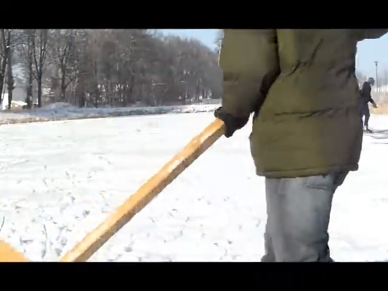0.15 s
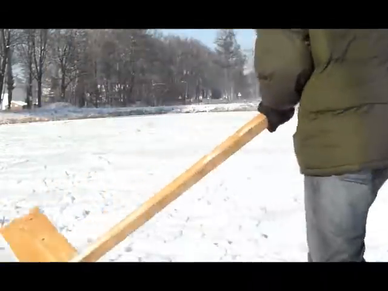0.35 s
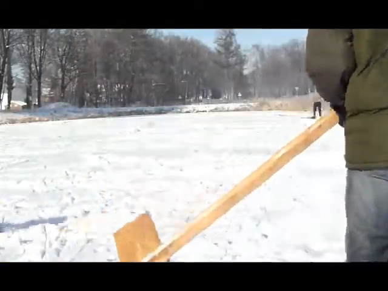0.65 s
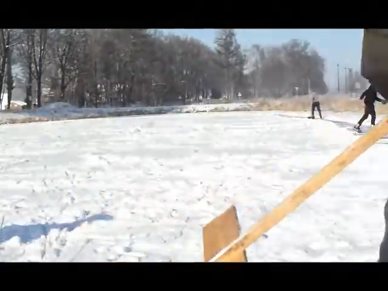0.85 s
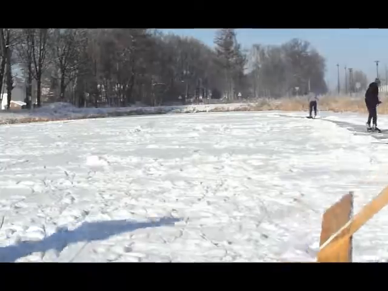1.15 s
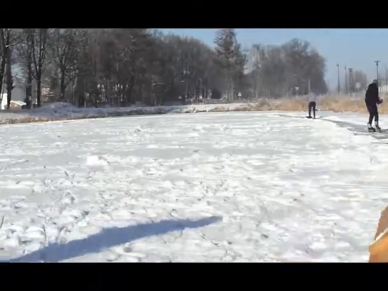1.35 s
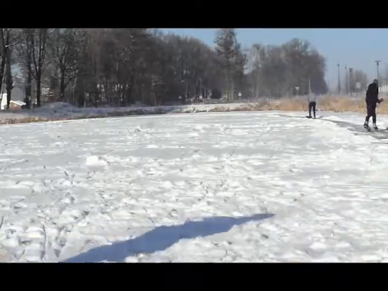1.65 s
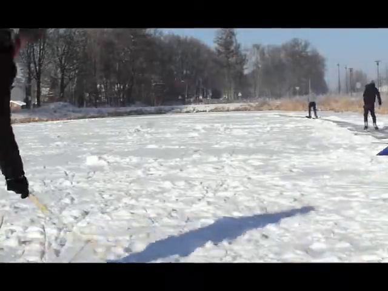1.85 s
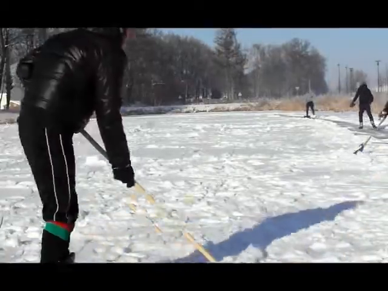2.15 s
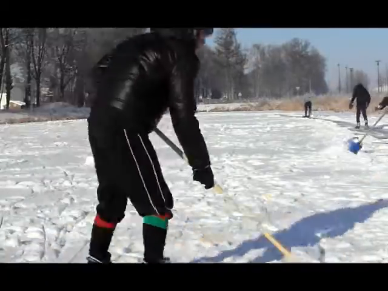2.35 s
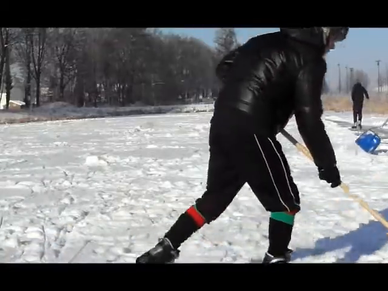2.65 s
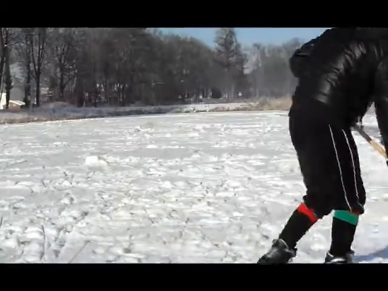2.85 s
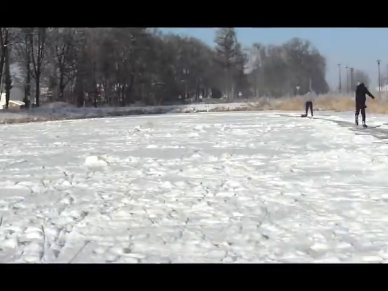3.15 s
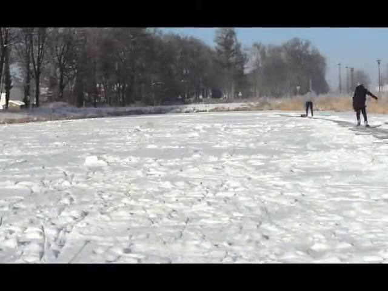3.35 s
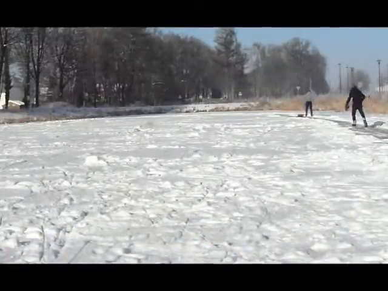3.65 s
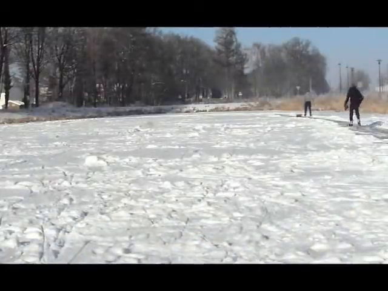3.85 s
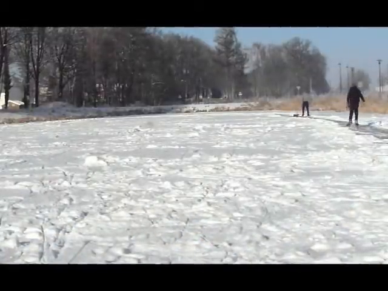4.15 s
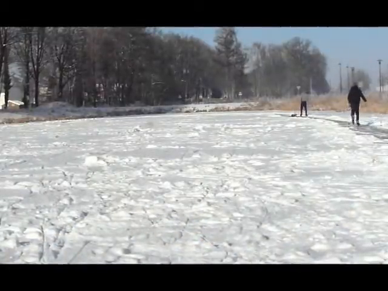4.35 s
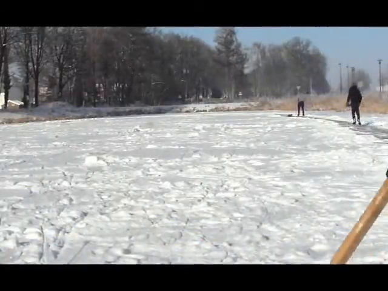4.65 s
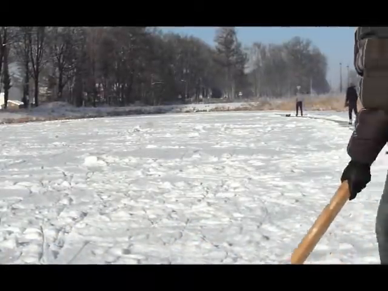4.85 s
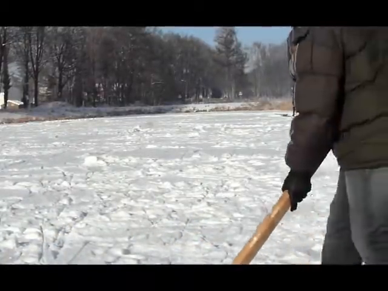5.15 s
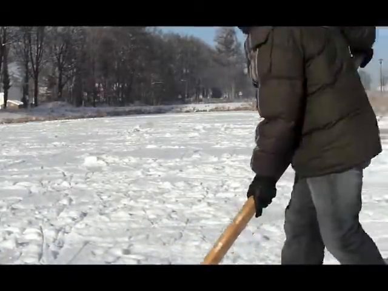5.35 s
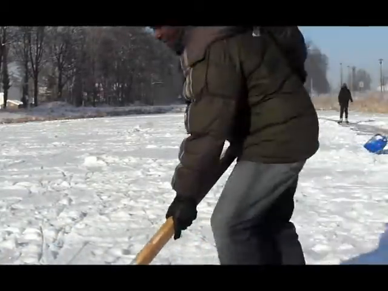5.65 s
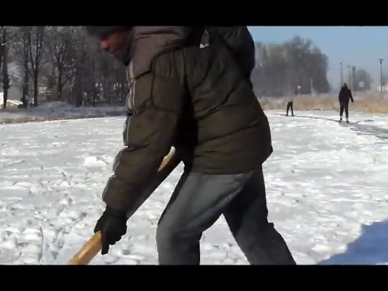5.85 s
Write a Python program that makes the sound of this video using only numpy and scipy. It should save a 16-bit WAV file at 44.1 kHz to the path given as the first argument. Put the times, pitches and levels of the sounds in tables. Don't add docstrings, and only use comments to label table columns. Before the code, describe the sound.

Near silence with faint air, then two wooden knocks as a broad shovel hits frozen ground, the second loudest. Continuous hoarse scraping over crusty snow follows, hollow and woody, shifting into a crunchier, hissier pass by another shovel. It dies away to muffled far-off scrapes and a few clicks. Low wind flutters irregularly on an outdoor handheld microphone, mostly on the right, with no echo.

```python
import sys
import numpy as np
from scipy import signal
from scipy.fft import rfft, irfft, next_fast_len
from scipy.io import wavfile
from scipy.ndimage import uniform_filter1d, map_coordinates

SR = 44100
rng = np.random.default_rng(int(sys.argv[2]) if len(sys.argv) > 2 else 0)


def dump(signal):
    limited = np.clip(np.atleast_2d(signal).T, -1, 1)
    pcm = np.round(limited * 32767).astype(np.int16)
    wavfile.write(sys.argv[1], SR, pcm)


def voltage_ratio(decibels):
    exponent = np.asarray(decibels, float) / 20
    return 10 ** exponent


N = 264687

# start [s], hold [s], level [dB], sharpness [dB].
DROPS = [
    (0.552, 0.027, -21, 8.5),
    (0.577, 0.03, -22, -2),
    (0.612, 0.017, -24, 5),
    (0.935, 0.054, -15.5, -7),
    (0.989, 0.03, -20.5, -1),
    (2.958, .008, -26.5, -2),
    (5.821, 0.017, -34, 1),
    (5.872, .0091, -54, 7),
    (5.951, 0.016, -38.5, -22),
]
# dB per dB of sharpness in board, hollow, crunch and hiss.
SHARPENS = (-0.33, 0.07, 0.65, 1.28)


def unit(x):
    return x / np.sqrt(np.mean(x ** 2) + 1e-20)


def along(points, hz):
    f, v = np.transpose(points)
    return np.interp(np.log(hz + 1), np.log(f + 1), v)


def curves(rows):
    s, *cols = np.transpose(rows)
    return np.array([np.interp(np.arange(N) / SR, s, c) for c in cols])


def wobble(rate):
    knots = rng.standard_normal(int(N * rate / SR) + 4)
    return map_coordinates(knots, [np.arange(N) * rate / SR])


def filtered(x, response):
    m = next_fast_len(N + 8192)
    return irfft(rfft(x, m) * response(np.fft.rfftfreq(m, 1 / SR)), m)[..., :N]


def coloured(x, spectrum):
    closed = [(1, -120)] + list(spectrum) + [(SR / 2, -120)]
    return unit(filtered(x, lambda hz: voltage_ratio(along(closed, hz))))


def shovel():
    # frequency [Hz], density [dB per Hz].
    board_bed = [(220, -50), (330, -11.5), (450, -4), (600, -3), (800, -4), (1400, -3.5), (2000, -11.5)]
    crunch = [(2500, -14), (3600, 1), (4800, 4.5), (6000, -1.5), (7500, -23)]
    fine_hiss = [(4500, -71), (6000, -4), (7100, 1), (8500, -1.5), (10000, -5), (11800, -8.5)]
    snow = bodies(grains(2500, spread_db=1.5, share=0.48, patchy_db=1.5), depth=1.9)
    layers = [coloured(snow, board_bed), unit(hollow(snow)), coloured(snow, crunch), coloured(snow, fine_hiss)]
    scrape = sum(gain * layer for gain, layer in zip(contact(), layers))
    return scrape + (knocks() + ticks()) * [[1], [.3]]


def contact():
    # time [s], force [dB], sharpness [dB].
    distant = [(0, -56, 6), (.08, -60, -6), (.3, -56.5, -19), (.5, -65, 4), (2.15, -62, 7),
               (4.3, -43.5, -20), (4.8, -42, -2), (5.0, -42.5, 17), (5.14, -46.5, -8), (5.3, -43, 7),
               (5.42, -46, 1), (5.54, -43, 5.5), (5.77, -39.5, 8.5), (6, -46, 12)]
    graze = [(.331, -50, 6), (.37, -40.5, 0), (.396, -41, 4), (.46, -47.5, -1.5), (.52, -47.5, -4.5)]
    drag = [(.54, -41.5, 21.5), (.66, -33.5, 7), (0.745, -41, -7), (.85, -39.5, -3.5), (.872, -37.5, 4),
            (.914, -38, -2), (.93, -39.5, 10)]
    long_push = [(.95, -33, -2), (1.03, -23, -0.5), (1.112, -22, 1), (1.28, -22.5, -0.35),
                 (1.44, -23.5, -1.6), (1.54, -26, 0.16), (1.62, -25, -1.7), (1.7, -32, 0.71),
                 (1.76, -30, 1)]
    shove = [(1.779, -31.5, 0.5), (1.9, -30, 3), (2.05, -31, -3), (2.13, -31, 5), (2.23, -28.5, 1),
             (2.35, -28, 2.5), (2.45, -33.5, 4.5), (2.62, -28.5, -5.5), (2.78, -30, 2)]
    passing = [(2.62, -58, -3.5), (2.8, -30.5, -1.7), (3, -38, -2), (3.06, -36, -0.5), (3.13, -34.5, -0.5),
               (3.17, -35, -1), (3.23, -31, -3), (3.41, -35.5, 3), (3.6, -34.5, 2.5)]
    way_back = [(3.62, -35.5, -2), (3.8, -29.5, -5.5), (4.08, -31, 1), (4.18, -27.5, 0.5), (4.34, -32.5, 6),
                (4.5, -44, -0.5), (4.63, -41.5, -2), (4.8, -55, 5.5), (4.85, -61.5, -11)]
    restart = [(5.849, -47.5, 13.5), (5.9, -41, 5.5), (5.945, -38.5, -5), (6, -46, -16)]
    # board, hollow, crunch and hiss relative to the force [dB].
    voices = [
        (-5, -12, -37, -49),
        (0, -2.5, -25, -24.5),
        (-2.5, -2, -15.5, -26.5),
        (-7.5, 0.5, -15, -9),
        (-5, -1.5, -13, -11.5),
        (1, -0.5, -3.5, -4.5),
        (-4.5, -0.5, 0, 0.5),
        (-13, -1, -15, -19),
    ]
    # time [s], length [s], depth [dB].
    skips = [
        (1.07, 0.051, 2),
        (1.567, 0.014, 5.5),
        (1.762, 0.023, 5.5),
        (2.672, 0.019, 4.5),
        (2.947, 0.0055, 1),
        (3.463, 0.03, 3.5),
        (3.59, .015, 1),
        (3.638, 0.0099, 5.5),
        (4.673, 0.024, 2),
        (5.075, 0.02, 11),
    ]
    skip_bites = (0.5, 1.4, 1.8, 1.2)
    # board, hollow, crunch and hiss [dB].
    drop_voice = (-4, -2.5, -21.5, -6)
    # time [s], drone [dB].
    lean = [(1, 2.5), (1.5, -1), (1.66, 4.5), (1.85, -0.5), (1.95, -11), (2.12, -8), (2.25, -4), (2.45, 8),
            (2.6, -6.5), (2.78, -9), (2.9, -4.5), (3.08, 4.5), (3.17, -6), (3.3, -1.5), (3.55, 1.5),
            (3.9, -3), (4.2, 4.5), (4.45, 5)]
    t = np.arange(N) / SR
    lift_db = sum(depth * np.exp(-((t - s) / length) ** 2) for s, length, depth in skips)
    strokes = (distant, graze, drag, long_push, shove, passing, way_back, restart)
    push = sum(map(stroke, voices, strokes))
    rough_db = 0.28 * wobble(22.83) + 0.77 * wobble(70)
    push = push * voltage_ratio(1.9 * (rough_db - np.outer(skip_bites, lift_db)))
    push[0] *= voltage_ratio(2 * curves(lean)[0])

    drops = np.zeros((4, N + SR))
    t = t[:SR // 4]
    for s, hold, db, sharp_db in DROPS:
        shape = np.clip(t / 0.0052, 0, 1) * voltage_ratio(-60 * np.clip(t - hold, 0, 9) / 0.067)
        layer_db = db + np.add(drop_voice, np.multiply(SHARPENS, sharp_db))
        drops[:, round(s * SR):][:, :len(t)] += (voltage_ratio(layer_db)[:, None] * shape) ** 2
    return np.sqrt(push[:, None] + drops[:, None, :N] * [[1], [.36]])


def stroke(voice, rows):
    grows = (0.56, 0.011, 0.033, 0.15)
    attack_db_per_s, release_db_per_s = 2498, 245.5
    t = np.arange(N) / SR
    force_db, sharp_db = curves(rows)
    force_db = force_db - attack_db_per_s * np.clip(rows[0][0] - t, 0, 9)
    force_db = force_db - release_db_per_s * np.clip(t - rows[-1][0], 0, 9)
    tilt_db = np.outer(SHARPENS, sharp_db) + np.outer(grows, force_db - force_db.max())
    return voltage_ratio(2 * (force_db + np.array(voice)[:, None] + tilt_db))


def grains(per_s, spread_db, share, patchy_db):
    hits = rng.random((2, N)) < per_s / SR
    cracks = hits * rng.standard_normal((2, N)) * voltage_ratio(spread_db * rng.standard_normal((2, N)))
    z = signal.stft(share * unit(cracks) + rng.standard_normal((2, N)), nperseg=256)[2]
    field = uniform_filter1d(rng.standard_normal(z.shape[1:]), size=2, axis=0)
    field = uniform_filter1d(field, size=14, axis=1)
    return signal.istft(z * voltage_ratio(patchy_db * unit(field)), nperseg=256)[1][:, :N]


def bodies(x, depth):
    # frequency [Hz], width [Hz], lift over the bed [dB].
    grazed = [(1320, 350, 1.5), (541, 170, -6.5), (2300, 500, 0)]
    held = [(537, 89, 1.5), (858, 105, 6.5), (1065, 54, -14.0), (1464, 96, 8.5), (4750, 38, 5),
            (5000, 46, 8.5), (5560, 120, 8.5), (6600, 60, -11.0), (7000, 58, 3.5), (8500, 50, 1.5)]
    landed = [(454, 75, 1.6), (1014, 136, 4.8), (1340, 38, 1.7), (1673, 65, 4.1), (2193, 97, 1.1),
              (2450, 80, 1.9), (2700, 73, 2.01), (3920, 40, 2.8), (4500, 86, 3.3), (5040, 77, 5.8),
              (5500, 59, 3.5), (6780, 40, 3), (7500, 88, 2), (8120, 220, 1.6), (8900, 250, 3.4)]
    pushed = [(463, 37, 3.3), (953, 157, 6.6), (1900, 120, 4.9), (2200, 71, 3.6), (2460, 41, 3.9),
              (2725, 60, 3), (2900, 59, 3.7), (3290, 35, 4.6), (3630, 44, 2.3), (4340, 47, 4.3),
              (5380, 170, 2), (5920, 70, 6.4), (6590, 60, 4.5), (7110, 230, 4.6), (7860, 200, 5.5)]
    loaded = [(600, 190, 0.5), (914, 100, 4.5), (1840, 53, 3.5), (2530, 74, 4), (2300, 140, 1.5),
              (2830, 130, 4), (3390, 66, 2.5), (4140, 90, 3), (4900, 130, -1), (7100, 110, 1),
              (7840, 150, 1), (9400, 190, 0)]
    passed = [(820, 540, 3.9), (1310, 73, 2.2), (2198, 72, 3.8), (2870, 53, 2.5), (3200, 63, 2),
              (4740, 200, 1.1), (6500, 68, 2)]
    second = [(858, 315, 5.2), (1348, 56, 2.7), (1900, 56, 2.2), (2220, 35, 3.3), (2600, 166, 0.6),
              (4300, 53, 1.4), (4780, 68, 3.2), (5480, 210, 2.3), (6160, 200, 1.5), (7170, 360, 2.7)]
    easing = [(680, 350, 6.5), (1000, 160, 1), (1297, 130, 3.5), (1900, 440, -3), (2360, 130, 3.5),
              (3330, 120, 3), (3630, 200, -3.5), (4900, 2000, 3.5), (7300, 1000, -1)]
    far = [(660, 500, 4.5), (960, 390, 4), (2010, 91, -7.5), (2130, 130, -6), (2600, 500, 0),
           (3350, 150, 1), (3570, 270, -2.5)]
    # time [s], fade [s].
    turns = [(.545, 0.009), (.68, 0.1), (.93, 0.017), (1.22, 0.31), (2.0, 0.26), (2.68, 0.11), (3.6, 0.46),
             (4.44, 0.14), (4.85, 0.058), (5.08, .04), (5.53, .08)]
    order = (grazed, held, held[2:3], landed, pushed, loaded, passed, second, easing, far[:2], far, far[:2])
    t = np.arange(N) / SR
    fades = [np.clip((t - s) / fade + .5, 0, 1) for s, fade in turns]
    edges = np.array([np.ones(N)] + fades + [np.zeros(N)])

    def lift(f, modes):
        return unit(voltage_ratio(sum(depth * db / (1 + (2 * (f - c) / w) ** 2) for c, w, db in modes)))

    each = filtered(x, lambda f: np.array([[lift(f, modes)] for modes in order]))
    return np.sum(-np.diff(edges, axis=0)[:, None] * each, axis=0)


def hollow(x):
    # time [s], centre [Hz], width [share of centre].
    pocket = [(.335, 2300, 0.25), (.38, 3500, 0.18), (0.43, 4500, 0.26), (.47, 4300, 0.65),
              (.52, 2020, 0.59), (.9, 2570, 0.31), (.93, 2040, 0.31), (1.08, 2200, 0.3), (1.18, 2420, 0.23),
              (1.28, 2730, 0.16), (1.45, 2870, 0.18), (1.62, 2950, 0.23), (1.9, 2950, 0.29),
              (2.1, 2900, 0.68), (2.25, 2460, 0.37), (2.42, 2820, 0.38), (2.62, 2840, 0.71),
              (2.78, 2300, 0.47), (2.95, 1970, 0.73), (3.13, 3130, 0.45), (3.3, 2340, 0.71),
              (4.34, 2280, 0.42), (4.73, 2540, 0.53), (5.13, 2630, 0.37), (5.32, 2300, 0.5),
              (5.55, 1910, 0.4), (5.7, 2200, 0.56), (6, 2300, 0.42)]
    # time [s], limit [Hz].
    reach = [(0, 6000), (.5, 5540), (.54, 11000), (.7, 9000), (.74, 5500), (.9, 6500), (.93, 16000),
             (4.8, 16000), (4.86, 3400), (5, 3900), (5.06, 3500), (5.17, 3780), (5.22, 3000), (5.39, 3000),
             (5.43, 2600), (5.62, 2700), (5.66, 3000), (5.8, 3100), (5.84, 9000)]
    hz, t, z = signal.stft(x, SR, nperseg=256)
    hz = hz[:, None]
    s, centre, breadth = np.transpose(pocket)
    off = (hz / np.interp(t, s, centre) - 1) / np.interp(t, s, np.clip(breadth, .1, 2))
    gain = 1 / (1 + (2 * off) ** 2) ** 0.45 + 0.28 / (1 + off ** 10)
    gain = gain / (1 + (700 / (hz + 1)) ** 4)
    gain = gain * (voltage_ratio(-13) + 1 / (1 + (hz / np.interp(t, *np.transpose(reach))) ** 19))
    return signal.istft(z * gain / np.linalg.norm(gain, axis=0), SR, nperseg=256)[1][:, :N]


def knocks():
    # time [s], peak [dB], pitch [Hz], crack [dB].
    lumps = [(.3295, -48, 1980, 1), (.939, -21, 1520, -2), (0.947, -3, 960, -12), (0.955, 3, 867, -11.5),
             (.961, -3, 905, -12), (.978, -9, 500, -20), (0.966, -6.5, 284, -29), (0.9705, 2, 960, -16),
             (.976, -11, 2120, -10), (0.989, -7, 700, -22), (2.687, -19, 1340, -14), (2.961, -27, 950, -12),
             (2.964, -19, 2830, -10), (3.126, -19, 3200, -10), (2.487, -34.5, 2870, -12),
             (2.999, -19.5, 7700, 2), (3.074, -14.5, 780, -10), (3.148, -27, 5200, -3),
             (3.139, -16.5, 844, -36), (3.2, -20.5, 4600, 4.5), (3.2195, -9, 680, -16),
             (4.181, -17, 500, -20), (4.625, -29, 4600, 0), (4.682, -28, 775, -20.5),
             (4.825, -25, 680, -23), (5.458, -28, 942, -21), (5.511, -23.5, 600, -31),
             (5.536, -27, 734, -29.5), (5.748, -22, 1000, -29), (5.7565, -21, 700, -27),
             (5.954, -26, 805, -25)]
    # frequency [Hz], level [dB], 60 dB decay [s].
    ring_modes = [(867, 0, .6), (1059, 0, 0.66), (1410, 11.5, 0.28), (1720, 0, 0.25), (1984, 3, 0.54)]
    out = np.zeros(N + SR)
    t = np.arange(SR // 10) / SR
    for s, db, hz, crack_db in lumps:
        tap = voltage_ratio(-60 * t / 0.018) * np.sin(2 * np.pi * hz * t) * (1 - np.exp(-t / 0.00027))
        crack = voltage_ratio(crack_db - 60 * t / 0.0099) * rng.standard_normal(len(t))
        out[round(s * SR):][:len(t)] += voltage_ratio(db) * (crack + tap)
    t = np.arange(SR) / SR
    ring = 0
    for hz, db, t60 in ring_modes:
        flutter_db = 4.5 * wobble(30.3)[:SR]
        ring = ring + voltage_ratio(db - 29.0 - 60 * t / t60 + flutter_db) * np.sin(2 * np.pi * hz * t)
    out[round(DROPS[0][0] * SR):][:SR] += ring * (1 - np.exp(-t / 0.0071))
    return filtered(out[:N], lambda hz: (1j * hz / (170 + 1j * hz)) ** 2)


def ticks():
    # (frequency [Hz], width [Hz], level [dB]).
    scratches = [
        ((-0.05, 0.13, -61), [(1810, 90, 6), (4930, 310, -1)]),
        ((1.04, 0.29, -47.5), [(254, 9.2, 0)]),
        ((0.512, 0.18, -54.5), [(190, 13.4, 0)]),
        ((5.1, 0.09, -59.5), [(3400, 155, 2), (5000, 180, -2)]),
        ((5.113, 0.014, -44.5), [(3130, 60, -7), (3320, 60, 0), (3630, 50, -12), (4780, 50, -11), (5300, 80, -16)]),
        ((5.785, 0.0073, -48.5), [(3520, 130, 6), (5030, 110, -20)]),
        ((5.826, 0.012, -23), [(554, 51, -7), (880, 150, -13), (1770, 47, -1), (2950, 62, -8), (3250, 190, -7.5), (7100, 120, -8)]),
    ]
    t, out = np.arange(N) / SR, 0
    for (s, length, db), modes in scratches:
        def edge(f):
            return sum(voltage_ratio(g) * (1j * f * 4 * w / (c * c - f * f + 4j * f * w)) ** 2 for c, w, g in modes)

        scratch = np.sin(np.pi * np.clip((t - s) / length, 0, 1)) * rng.standard_normal(N)
        out = out + voltage_ratio(db) * unit(filtered(scratch, edge)) * np.sqrt(length * SR / N)
    return out


def ports(streams):
    # time [s], left lag [us], left minus right [dB].
    bearing = [(0, 3, -10), (1.2, 11.5, -6), (2, 23, -7.5), (2.7, 58, -7), (3.5, 58, -7), (4.6, 65.4, -8),
               (5.5, 42, -12), (6, 59, -7.5)]
    # frequency [Hz], left-right likeness [0 to 1].
    alike = [(400, .92), (1200, .94), (3000, .86), (7000, .78), (11000, .6)]

    def split(hz):
        turn = np.arccos(np.clip(along(alike, hz), -1, 1)) / 2
        return np.array([np.cos(turn), np.sin(turn)])

    direct, scattered = filtered(streams, split)
    lag_us, pan_db = curves(bearing)
    left = map_coordinates(direct + scattered, [np.arange(N) - lag_us * SR / 1e6], order=3)
    return np.array([left * voltage_ratio(pan_db / 2), (direct - scattered) * voltage_ratio(-pan_db / 2)])


def wind():
    # frequency [Hz], density [dB per Hz].
    buffet = [(12, -55.5), (20, 6.5), (56, 7.5), (118, 5), (255, -4.5), (414, -16.5), (455, -16),
              (500, -19), (650, -52), (1100, -120)]
    # time [s], peak [dB], pitch [Hz], left minus right [dB].
    pops = [
        (0.299, -25.5, 145, -21.5),
        (3.57, -20.5, 156, -10),
        (3.581, -15.5, 264, -19),
        (3.629, -17, 190, -13),
        (3.6003, -13, 168, -20),
        (5.383, -17, 246, -24),
    ]
    eddies = [(1.189, -31.5, 440, -4), (1.356, -31, 140, -14.5), (1.433, -28, 114, -1),
              (1.527, -25, 226, -23.5), (1.737, -28, 147, -18.5), (1.912, -27, 102, -28.5),
              (1.964, -29, 151, -17), (2.046, -32, 117, -16.0), (2.132, -33, 202, -21),
              (2.177, -18.5, 144, -18), (2.269, -21.5, 141, -14.0), (2.357, -19, 238, -13),
              (2.459, -16.5, 302, -20.5), (2.568, -18, 187, -23), (2.851, -19.5, 131, -13.5),
              (2.931, -31, 151, -16.5), (2.998, -21, 138, -20), (3.138, -38, 131, -16.5),
              (3.215, -20, 394, -4), (3.264, -33, 137, -12.0), (3.305, -19.5, 120, -16),
              (3.406, -19.5, 176, -25), (3.504, -27, 183, -15), (3.6, -17, 263, -14),
              (3.697, -17.5, 126, -5), (3.762, -34, 150, -2.0), (3.786, -28, 135, 7),
              (3.83, -15.5, 139, -26), (3.932, -32, 167, -24), (4.014, -24.5, 172, -26.5),
              (4.12, -20.5, 156, -25), (4.18, -34, 444, -7), (4.429, -25, 103, -15),
              (4.563, -26.5, 153, -25), (4.971, -27, 118, -9), (5.345, -26, 102.5, -20)]
    buffet_db, pan_db = gusts()
    lumps = voltage_ratio(5.4 * np.array([wobble(35), wobble(35)]))
    rumble = lumps * coloured(rng.standard_normal((2, N)), buffet)
    rumble = rumble / np.sqrt(np.abs(uniform_filter1d(rumble ** 2, size=4000)) + 0.014)
    deep = filtered(rumble, lambda hz: 1 / (1 + (hz / 170) ** 4))
    rumble = deep + (rumble - deep) * voltage_ratio(buffet_db + 31.0)
    low_cut_hz = np.array([[30], [90]])
    rumble = filtered(rumble, lambda hz: hz ** 2 / (hz ** 2 + low_cut_hz ** 2))
    sides = voltage_ratio(np.array([pan_db, -pan_db]) / 2)
    out = voltage_ratio(buffet_db + 6.0) * rumble * sides / np.hypot(*sides)

    t = np.arange(-SR // 50, SR // 20) / SR
    for s, db, hz, pan in pops + [(s, db - 2, hz, pan) for s, db, hz, pan in eddies]:
        u = t * hz - 1
        pop = 1.75 * np.exp(-(u / 0.56) ** 2) * np.cos(2 * np.pi * u)
        out[:, round((s + t[0]) * SR):][:, :len(t)] += voltage_ratio([[db + min(pan, 0)], [db]]) * pop
    return out


def gusts():
    # time [s], spread [s], level [dB], left minus right [dB].
    puffs = [(.054, 0.043, -48.5, -18), (.216, 0.052, -41, -37), (.31, 0.044, -39, -17),
             (.55, 0.048, -48.5, -21), (.64, 0.043, -53.5, -8), (1.03, 0.067, -34, -9.5),
             (1.16, 0.08, -40, -17), (1.43, 0.054, -32, 0), (1.54, 0.28, -35.5, -21),
             (1.77, 0.056, -31.5, -21), (1.98, 0.062, -32.5, -32), (2.25, 0.18, -31, -14),
             (2.55, 0.11, -27.5, -16.5), (2.75, 0.1, -35, 0), (2.94, 0.11, -26.5, -18),
             (3.33, 0.14, -30, -14), (3.63, 0.091, -23.5, -12), (3.82, 0.073, -28, -10),
             (4.03, 0.022, -31.5, -27), (4.14, 0.14, -34.5, -18), (4.34, 0.041, -45, -15.5),
             (4.45, 0.075, -37.5, -10.5), (4.579, 0.05, -33.5, -11), (4.8, 0.14, -36.5, -7),
             (5.01, 0.051, -32.5, -19.5), (5.385, 0.044, -30.5, -16), (5.54, 0.095, -31.5, -15),
             (5.82, 0.057, -31, -17.5), (5.96, 0.14, -31, -14)]
    calm_db, calm_pan_db = -57, -20.5
    s, spread, db, pan = np.transpose(puffs)[:, :, None]
    t = np.arange(0, N, 64) / SR
    power = voltage_ratio(2 * (db - 6 * np.abs((t - s) / spread) ** 1.8))
    calm = voltage_ratio(2 * calm_db)
    total = power.sum(axis=0) + calm
    pan_db = ((power * pan).sum(axis=0) + calm * calm_pan_db) / total
    return curves(np.transpose([t, 10 * np.log10(total), pan_db]))


def air():
    # frequency [Hz], density [dB per Hz].
    open_air = [(180, -35), (300, 8), (838, 1), (2340, -22), (3540, -0.5), (4740, -5.5), (10400, -8),
                (11700, -9), (15200, -57.5), (22000, -120)]
    draught = [(18, -20.5), (50, -0.5), (130, -18), (300, -5)]
    hiss = voltage_ratio(-64.5 + np.array([[-3], [5]])) * coloured(rng.standard_normal((2, N)), open_air)
    return hiss + voltage_ratio([[-70], [-65]]) * coloured(rng.standard_normal((2, N)), draught)


def scene():
    return ports(shovel()) + wind() + air()


def top_cut(x):
    return signal.sosfilt(signal.butter(12, 11860, fs=SR, output="sos"), x)


def record(dry):
    held_back = dry / (1 + np.abs(dry / 1.07) ** 8) ** (1 / 8)
    top_hz, fall_hz_per_db = 11470, 2.8
    mix = filtered(held_back, lambda hz: voltage_ratio(-np.clip(hz - top_hz, 0, 400) / fall_hz_per_db))
    return top_cut(mix)


dry = scene()
out = record(dry)
dump(out)
```